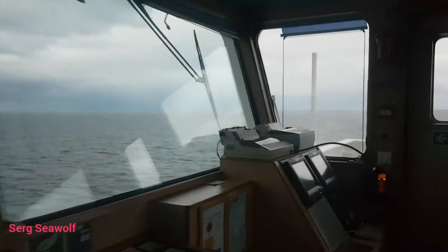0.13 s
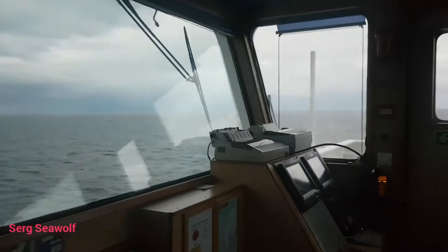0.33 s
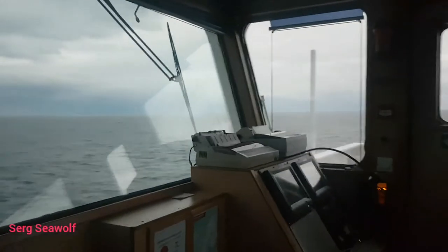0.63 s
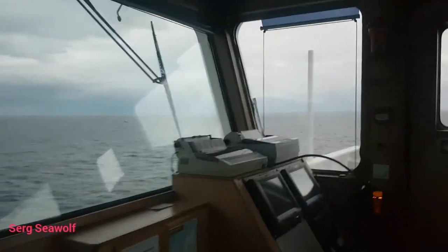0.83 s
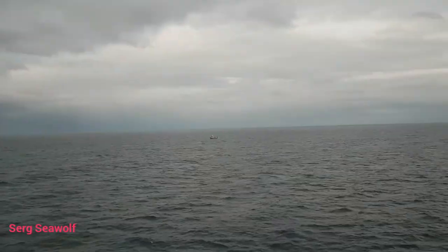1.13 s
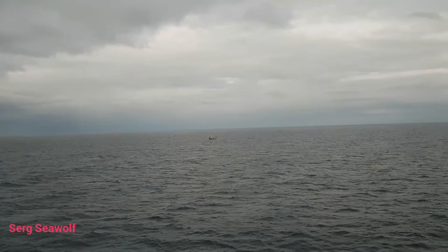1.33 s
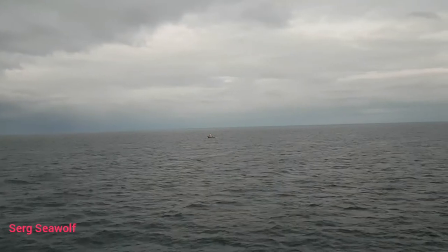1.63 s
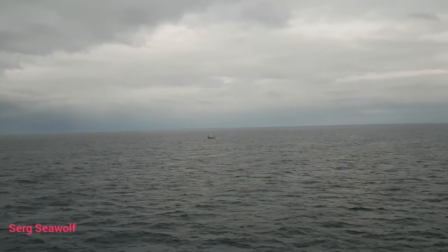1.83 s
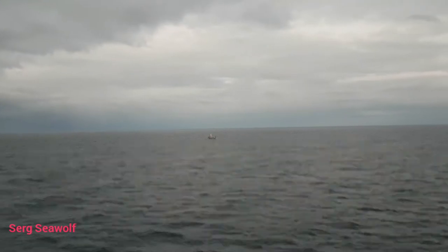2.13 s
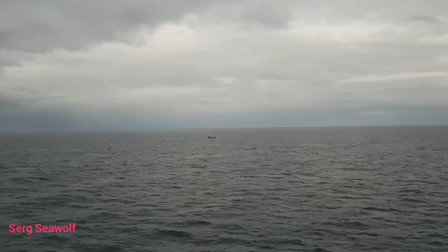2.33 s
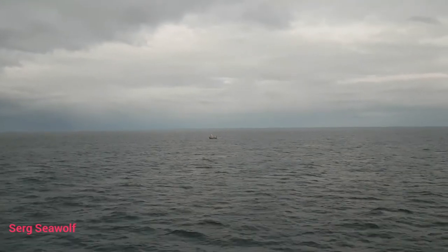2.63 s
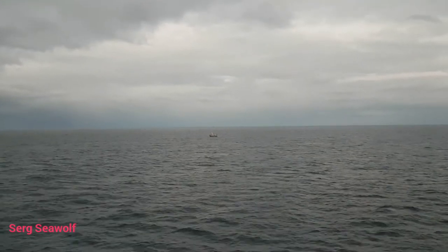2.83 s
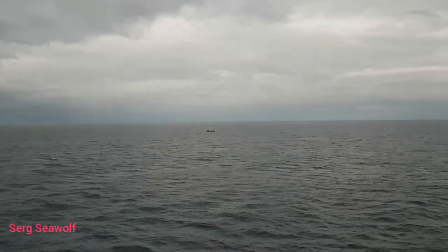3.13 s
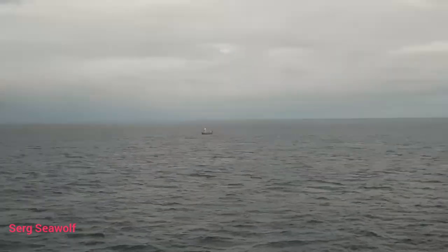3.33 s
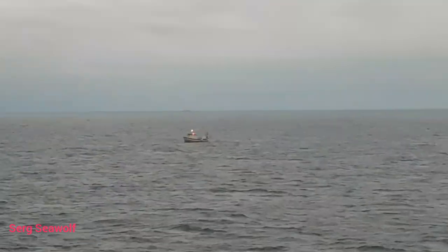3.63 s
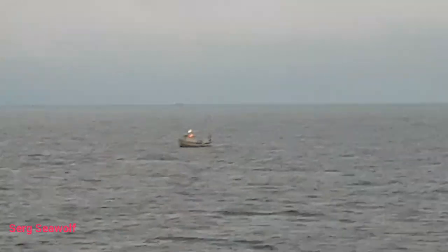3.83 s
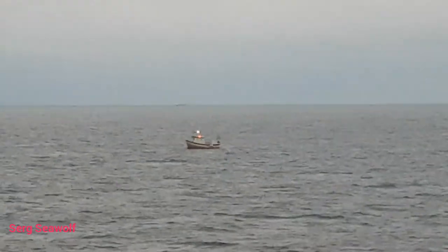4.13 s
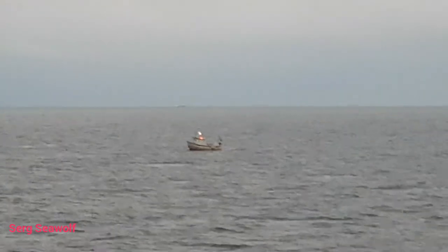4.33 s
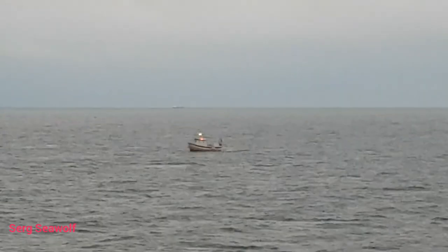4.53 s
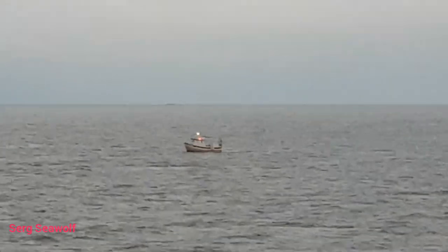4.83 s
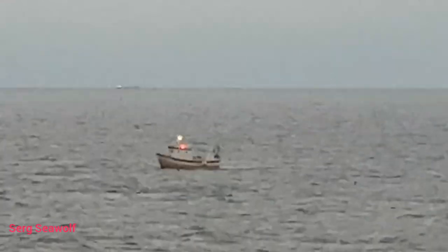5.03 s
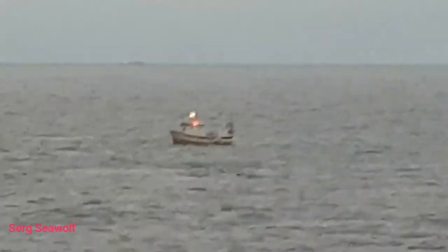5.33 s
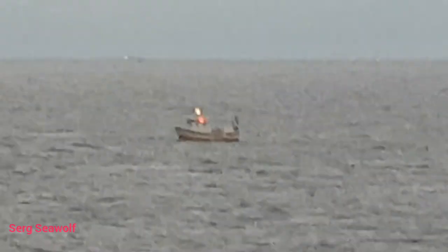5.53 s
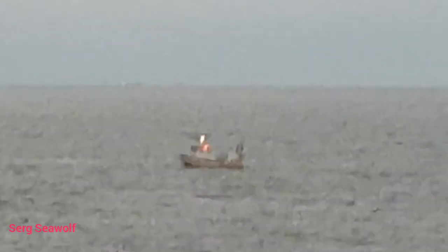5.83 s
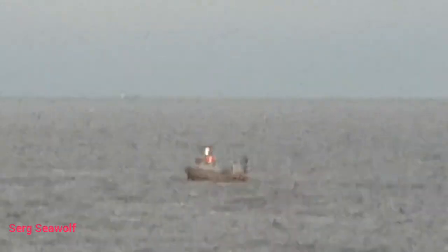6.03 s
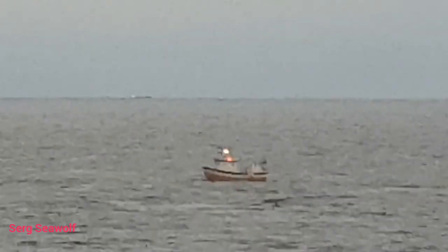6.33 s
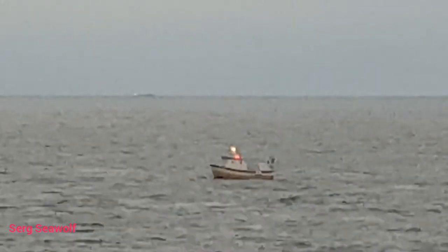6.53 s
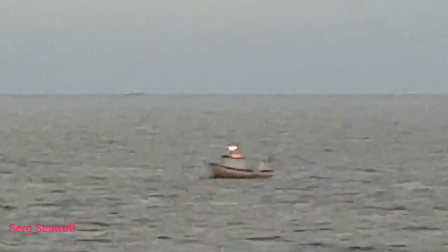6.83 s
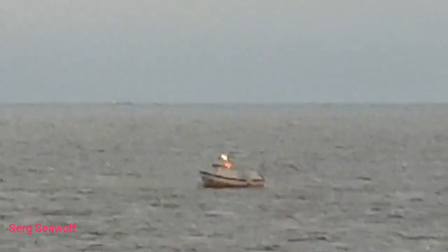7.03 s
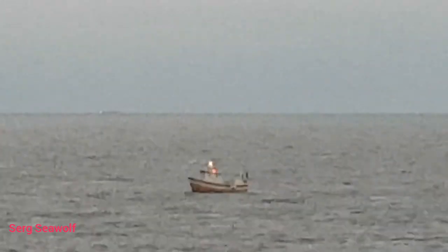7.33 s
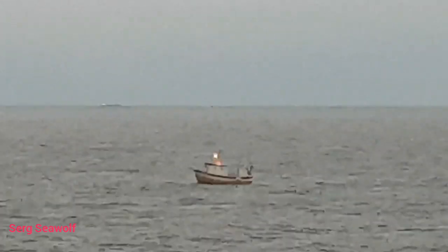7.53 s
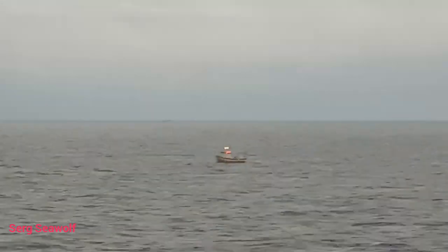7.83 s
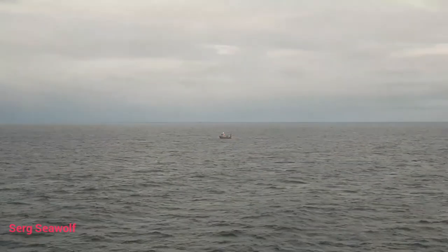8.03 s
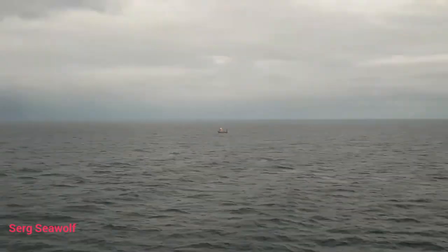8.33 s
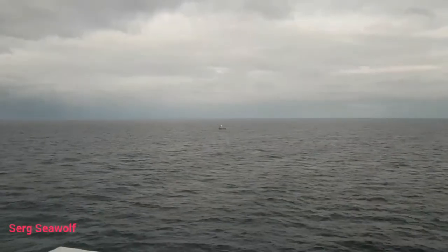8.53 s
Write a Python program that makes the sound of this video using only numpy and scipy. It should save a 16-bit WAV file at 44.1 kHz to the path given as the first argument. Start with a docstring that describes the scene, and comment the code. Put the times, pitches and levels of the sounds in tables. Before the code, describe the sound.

A short indoor machine hum gives way to irregular wind gusts thumping and popping on the microphone, with a ship's engine rumbling underneath.

```python
"""A small stereo microphone on a ship. First, sheltered in the wheelhouse, machinery hums over room noise. At
1.65 s a dry tick sounds and the scene changes to the open deck. Gusts sweep eddies over each port separately;
the faster the air, the higher the buffeting reaches. Sudden jets pop the diaphragm, amid dry crackles. Between
the gusts, engine rumble, sea wash and a thin hiss swell and sink together to the end."""
import sys
import numpy as np
from scipy import signal
from scipy.fft import rfft, irfft
from scipy.io import wavfile
from scipy.ndimage import uniform_filter1d

SR = 44100
rng = np.random.default_rng(int(sys.argv[2]) if len(sys.argv) > 2 else 0)


def to_wav(sig):
    """Store sig (one row per channel, or 1-D mono) as 16-bit WAV at the path in sys.argv[1].

    Samples outside -1..1 are clipped; the rate is SR.
    """
    pcm = np.clip(np.atleast_2d(sig), -1, 1) * 32767
    pcm = np.round(pcm).astype(np.int16)
    wavfile.write(sys.argv[1], SR, pcm.T)  # frames by channels


N = 383229
TIME_S = np.arange(N) / SR
ON_DECK_S = 1.6547
PORT_LAG_S = .0003   # travel time between the ports
LEFT, RIGHT = 1, -1


def from_db(db):
    return 10 ** (np.asarray(db) / 20)


def unit_rms(x):
    return x / np.sqrt(np.mean(x ** 2) + 1e-20)


def butter(x, order, hz, kind="low"):
    return signal.sosfilt(signal.butter(order, hz, kind, fs=SR, output="sos"), x)


def in_time(rows):
    """One per-sample curve for each column after the time."""
    times_s, *columns = np.transpose(rows)
    return [np.interp(TIME_S, times_s, column) for column in columns]


def at_hz(points, hz):
    """A spectrum read on a log-frequency axis."""
    points_hz, values = np.transpose(points)
    return np.interp(np.log(hz), np.log(points_hz), values)


def pan(left_right_db):
    """Left and right gains."""
    return from_db(left_right_db / 2 * np.array([[1], [-1]]))


def drift(rate_hz):
    """Slow random wander, rms 1."""
    hop, settle = 40, 2000
    pole = np.exp(-2 * np.pi * rate_hz * hop / SR)
    noise = rng.standard_normal(N // hop + settle + 2)
    slow = signal.lfilter([1], [1, -2 * pole, pole ** 2], noise)[settle:]
    return np.interp(np.arange(N) / hop, np.arange(len(slow)), unit_rms(slow))


def wavering_tone(hz, width_hz, waver_db):
    """A sine whose phase and level wander."""
    phase = 2 * np.pi * (hz * TIME_S + rng.random()) + 1.9 * drift(width_hz)
    return np.sqrt(2) * from_db(waver_db * drift(3.9)) * np.sin(phase)


def outdoors():
    """0 inside, 1 on deck; 4 ms crossfade."""
    return np.clip((TIME_S - ON_DECK_S) / .004, 0, 1)


# Left-right likeness of diffuse noise: (frequency [Hz], coherence [0..1])
COHERENCE = [(60, .93), (300, 0.94), (520, 0.91), (890, 1), (2000, 0.045), (4000, 0.017), (9000, 0.22),
             (15000, 0.87)]

def diffuse_noise(spectrum, balance, left_lag_s):
    """Coloured stereo noise, rms 1, alike at both ports in the bass and the top treble."""
    hz = np.maximum(np.fft.rfftfreq(N, 1 / SR), 1)
    mid, side = rfft(rng.standard_normal((2, N)))
    coherence = at_hz(COHERENCE, hz)
    mid = mid * np.exp(1j * np.pi * hz * left_lag_s * np.array([[-1], [1]]))
    pair = np.sqrt(1 + coherence) * mid + np.sqrt(1 - coherence) * side * [[1], [-1]]
    return unit_rms(irfft(pair * pan(at_hz(balance, hz)) * from_db(at_hz(spectrum, hz)), N))


# Hiss spectrum: (frequency [Hz], relative density [dB])
HISS_SPECTRUM = [(3000, -35.5), (7000, -17), (8500, -12.5), (10000, -12), (13000, -6), (15000, -4.5),
                 (16000, -14)]
# Hiss level, also followed by the deck noise: (time [s], level [dB])
BACKGROUND_SWELL = [(0, -76), (1.654, -76), (1.656, -86.5), (2.25, -81.5), (2.6, -85.5), (3.25, -85),
                    (3.5, -76.5), (4.03, -77), (4.2, -87.5), (4.8, -84.5), (5.45, -76.5), (5.86, -75.5),
                    (5.9, -78.5), (6.38, -83), (6.75, -75.5), (7.2, -75.5), (7.45, -82.5), (8.69, -79.5)]
# Balance of hiss and deck noise: (frequency [Hz], left over right [dB])
BACKGROUND_BALANCE = [(100, -4.5), (300, 0), (800, 8.5), (2600, 10.5), (4000, 6.5), (6000, 9), (12000, 1)]

def hiss():
    """Thin treble noise that swells and sinks."""
    swell_db, = in_time(BACKGROUND_SWELL)
    return from_db(swell_db) * diffuse_noise(HISS_SPECTRUM, BACKGROUND_BALANCE, left_lag_s=0)


def rustle(at_s=1.42, spread_s=.07, hz=3800, level_db=-73):
    """A faint, brief swell of narrow-band noise."""
    band = unit_rms(butter(rng.standard_normal(N), 2, [.92 * hz, 1.15 * hz], "band"))
    envelope = np.exp(-.5 * ((TIME_S - at_s) / spread_s) ** 2)
    return pan(4.4) * from_db(level_db) * envelope * band


# Machinery tones: (frequency [Hz], width [Hz], start level [dB], end level [dB], left over right [dB])
MACHINERY_TONES = [(48.4, 1.9, -42.5, -35.5, 1.5), (114.3, 11, -40.5, -38.5, -2.5),
                   (237.8, 1.4, -25, -36, 2.5), (597, 14, -55, -58, 9.5), (1196, 7.7, -68, -75.5, -10.5),
                   (3542, 3.0, -85, -84, 0)]
# Room noise spectrum: (frequency [Hz], relative density [dB])
ROOM_SPECTRUM = [(20, -37), (46, -25.5), (62, -13), (115, -4), (170, -8), (300, -20.5), (600, -28.5),
                 (750, -34.5), (1100, -34.5), (2000, -41.5), (3200, -54.5), (5000, -59.5), (8000, -77.5)]
# Room noise balance: (frequency [Hz], left over right [dB])
ROOM_BALANCE = [(200, -2), (800, 8), (1700, 10), (4000, 3.5), (6000, 5)]

def wheelhouse(room_db=-32):
    """Machinery hum, a rustle, and sheltered room noise that reaches the left port first."""
    progress = np.minimum(TIME_S / ON_DECK_S, 1) ** .6
    inside = np.zeros((2, N))
    for hz, width_hz, start_db, end_db, pan_db in MACHINERY_TONES:
        tone = wavering_tone(hz, width_hz, waver_db=4.2 if hz > 400 else 2.1)
        inside += pan(pan_db) * from_db(start_db + (end_db - start_db) * progress) * tone
    inside += rustle()
    inside += from_db(room_db) * diffuse_noise(ROOM_SPECTRUM, ROOM_BALANCE, -PORT_LAG_S)
    return (1 - outdoors()) * inside


# Engine tones on deck: (frequency [Hz], width [Hz], level over hiss [dB])
ENGINE_TONES = [(64.2, 2.2, 46.5), (114.3, 13, 46)]
# Rumble and wash spectrum: (frequency [Hz], relative density [dB])
DECK_SPECTRUM = [(20, -25), (65, -13), (120, -10.5), (206, -12), (300, -22), (550, -28.5), (970, -33.5),
                 (2170, -41), (3050, -53.5), (5000, -61), (8000, -83.5)]

def deck(wash_over_hiss_db=47):
    """Engine rumble and sea wash in the open; the noise reaches the right port first."""
    swell_db, = in_time(BACKGROUND_SWELL)
    engine = sum(from_db(db) * wavering_tone(hz, width_hz, waver_db=.5)
                 for hz, width_hz, db in ENGINE_TONES)
    wash_gain = from_db(wash_over_hiss_db + .32 * drift(2.3))
    wash = wash_gain * diffuse_noise(DECK_SPECTRUM, BACKGROUND_BALANCE, PORT_LAG_S)
    return outdoors() * from_db(swell_db) * (engine + wash)


def tick(peak_db=-33, decay_s=.0004):
    """A step that dies at once, where inside turns to outside."""
    age_s = TIME_S - ON_DECK_S
    return from_db(peak_db) * (age_s >= 0) * np.exp(-np.abs(age_s) / decay_s)


# Dry crackles: (time [s], gain [dB], left over right [dB], upper edge [Hz])
DRY_CRACKLES = [(.575, -64, 2, 5000), (2.177, -49.5, -11, 5000), (2.458, -60, 16, 8500),
                (2.4659, -55, 15, 11000), (2.481, -58, 18, 8500), (3.923, -56, -16, 9000),
                (4.0253, -58, -14, 7570), (4.038, -55.5, -13, 8500), (4.097, -61, -14, 6450),
                (5.8752, -46, -11, 8500), (6.001, -60, 13, 7983), (8.187, -50, 5, 5800)]

def crackles():
    """Short bright ticks, each with a faint gritty tail."""
    track = np.zeros((2, N + SR))
    age_s = np.arange(round(.05 * SR)) / SR
    envelope = np.exp(-age_s / .0025) + .3 * np.exp(-age_s / .014)
    for at_s, gain_db, pan_db, top_hz in DRY_CRACKLES:
        grit = butter(rng.standard_normal(len(age_s)) * envelope, 3, [1500, top_hz], "band")
        start = round(at_s * SR)
        track[:, start:start + len(grit)] += pan(pan_db) * from_db(gain_db) * grit
    return track[:, :N]


# Jets inside the gusts: (time [s], relative level [dB], pop pitch [Hz], port [+1 left, -1 right])
AIR_JETS = [(2.345, -22, 399.8, 1), (2.381, -6.5, 851, 1), (2.395, -16, 580, 1), (2.425, -14, 612, -1),
            (2.458, -12, 652, 1), (2.483, -16, 493, 1), (2.494, -11, 850, 1), (2.509, -11, 650, 1),
            (2.53, -13, 783, 1), (2.564, -18.5, 402.5, 1), (2.589, -9, 778, 1), (2.615, -13, 699.4, 1),
            (3.455, -18.5, 499, -1), (3.766, -21.5, 393.2, 1), (3.916, -19.5, 394, -1),
            (3.983, -19.5, 399, 1), (4.038, -8, 850.5, -1), (4.078, -22, 450.6, -1),
            (4.149, -10, 542.4, -1), (4.202, -8, 700.2, -1), (4.5, -13, 280, -1), (4.714, -13.5, 279.1, -1),
            (5.213, -26, 402.1, 1), (5.875, -8.5, 599.7, -1), (5.898, -20, 350.4, -1),
            (5.931, -20, 449.6, -1), (6.0, -7, 478.1, 1), (6.018, -20.5, 501, 1), (6.184, -20.5, 401.4, 1),
            (6.472, -21.5, 450.4, -1), (7.211, -21, 451.2, -1), (7.226, -17, 452.1, -1),
            (7.376, -12.5, 584.8, 1), (7.428, -10, 551, -1), (7.483, -19.5, 401, -1),
            (7.526, -21, 449.8, -1), (7.542, -15, 599.8, -1), (7.566, -14, 550, -1),
            (7.646, -18.5, 347.5, 1), (7.738, -18, 652, -1), (7.782, -13, 450.4, 1), (7.809, -12, 555.3, 1),
            (8.058, -14, 599.5, 1), (8.064, -12, 799.3, 1), (8.142, -16, 599.4, 1),
            (8.226, -12.5, 650.3, -1), (8.25, -12, 704, -1), (8.576, -16.5, 502.8, 1),
            (8.597, -17.5, 449.6, 1)]

def jets(port, pop_db=11, rise_s=.00043, decay_cycles=.47, kick_per_khz=7.0, kick_s=.004):
    """Each jet pops the diaphragm and briefly kicks up the air speed, more so for sharp jets."""
    pops, kicks = np.zeros((2, N + SR))
    age_s = np.arange(round(.04 * SR)) / SR
    polarities = rng.choice([-1, 1], len(AIR_JETS))
    for (at_s, level_db, hz, struck_port), polarity in zip(AIR_JETS, polarities):
        if struck_port == port:
            span = slice(round(at_s * SR), round(at_s * SR) + len(age_s))
            envelope = np.minimum(age_s / rise_s, 1) * np.exp(-age_s * hz / decay_cycles)
            pops[span] += polarity * from_db(level_db + pop_db) * envelope * np.sin(2 * np.pi * hz * age_s)
            kicks[span] += kick_per_khz * hz / 1000 * from_db(level_db) * np.exp(-age_s / kick_s)
    return pops[:N], kicks[:N]


# Relative pressure swing of the breeze: (time [s], left [dB], right [dB])
BREEZE_SWING = [(1.6, -47, -51), (1.68, -35, -30), (1.86, -20, -33), (2.26, -28.5, -25), (2.39, -14, -22),
                (2.94, -30, -37.5), (3.4, -21.5, -25.5), (3.59, -26, -18.5), (3.82, -14, -20),
                (4.15, -24, -15), (4.37, -18, -26), (4.83, -31.5, -29), (5.13, -30, -28),
                (5.27, -22, -33.5), (5.65, -22, -26), (5.91, -22.5, -17.5), (6.2, -16.5, -24),
                (6.37, -44.5, -41), (6.5, -29.5, -23), (7.01, -24.5, -26.5), (7.31, -13, -10.5),
                (7.48, -33.5, -14), (7.78, -22, -30), (8.65, -15.5, -21)]
# Gusts: (start [s], length [s], relative pressure swing [dB], air speed [m/s], port [+1 left, -1 right])
PORT_GUSTS = [(1.661, 0.024, -29, 6.62, -1), (1.724, 0.049, -26, 5.02, -1), (1.841, 0.023, -26.5, 6.5, 1),
              (1.936, 0.027, -21, 7.23, -1), (1.95, 0.045, -24, 6.87, 1), (1.994, 0.014, -17, 12.2, -1),
              (2.078, 0.028, -22, 7.04, 1), (2.148, 0.034, -17, 7.5, -1), (2.19, 0.043, -23.5, 5.13, 1),
              (2.265, 0.064, -15, 4.07, -1), (2.331, 0.1, -12.5, 11.06, 1), (2.367, 0.032, -22.5, 7.6, -1),
              (2.415, 0.034, -15, 11.84, -1), (2.453, 0.087, -13, 11.85, 1),
              (2.479, 0.047, -22.5, 10.95, -1), (2.56, 0.072, -11.5, 10.5, 1), (2.561, 0.12, -18, 7.85, -1),
              (2.657, 0.073, -19, 8.18, 1), (2.807, 0.024, -26, 4.86, 1), (2.945, 0.026, -28, 8.1, 1),
              (3.023, 0.066, -23.5, 7.44, 1), (3.139, 0.035, -24.5, 5.67, 1), (3.186, 0.061, -20, 6.39, -1),
              (3.276, 0.021, -23.5, 5.34, 1), (3.278, 0.047, -18.5, 7.32, -1), (3.326, 0.045, -18, 3.61, 1),
              (3.351, 0.063, -13, 8.64, -1), (3.428, 0.023, -18, 6.12, 1), (3.45, 0.017, -18.5, 10.46, -1),
              (3.528, 0.023, -22, 5.46, -1), (3.586, 0.043, -12, 6.25, -1), (3.687, 0.032, -14, 6.1, 1),
              (3.738, 0.041, -16.5, 9.3, 1), (3.783, 0.074, -23, 3.46, -1), (3.837, 0.033, -13.5, 8.2, 1),
              (3.908, 0.068, -11.5, 7.83, -1), (3.945, 0.016, -16.5, 10.26, 1),
              (3.975, 0.029, -16, 12.1, 1), (4.033, 0.075, -13.5, 9.32, -1), (4.097, 0.021, -27, 9.57, 1),
              (4.119, 0.11, -10.5, 11.44, -1), (4.15, 0.035, -12.5, 16.5, -1),
              (4.257, 0.022, -20, 10.43, 1), (4.335, 0.048, -20, 7.06, -1), (4.367, 0.067, -22, 8.56, 1),
              (4.457, 0.08, -22, 4.63, 1), (4.499, 0.035, -20, 7.5, -1), (4.55, 0.036, -24.5, 10.54, -1),
              (4.727, 0.04, -24, 9.46, -1), (5.166, 0.022, -25.5, 9.24, 1), (5.216, 0.017, -17.5, 6.91, 1),
              (5.248, 0.068, -17.5, 6.12, 1), (5.27, 0.05, -19, 4.81, -1), (5.573, 0.022, -16, 6.48, -1),
              (5.575, 0.022, -12.5, 6.95, 1), (5.615, 0.042, -8.5, 4.83, -1), (5.839, 0.089, -18, 5.93, 1),
              (5.87, 0.091, -13, 6.8, -1), (5.989, 0.083, -23, 5.4, -1), (5.996, 0.012, -15, 7.17, 1),
              (6.028, 0.016, -24, 9.15, 1), (6.177, 0.037, -15.5, 6.2, 1), (6.241, 0.038, -24.5, 4.5, 1),
              (6.464, 0.033, -17.5, 7.34, -1), (7.172, 0.027, -13, 5.18, -1), (7.212, 0.045, -16, 6.03, 1),
              (7.221, 0.085, -9, 9.1, -1), (7.281, 0.046, -18, 4.69, 1), (7.318, 0.033, -13.5, 6.34, -1),
              (7.367, 0.048, -15, 10.66, 1), (7.371, 0.083, -7.5, 14.46, -1), (7.473, 0.028, -15, 8.66, -1),
              (7.521, 0.06, -15.5, 8.45, -1), (7.594, 0.017, -14.5, 4.41, 1), (7.636, 0.03, -15.5, 6.97, 1),
              (7.641, 0.024, -12, 7.86, -1), (7.695, 0.029, -19, 6.44, 1), (7.715, 0.046, -17, 8.6, -1),
              (7.778, 0.014, -19, 8.9, 1), (7.806, 0.014, -17, 11.4, 1), (7.835, 0.022, -19, 4.43, -1),
              (7.903, 0.081, -19, 5.27, -1), (7.913, 0.039, -18.5, 7.15, 1), (7.994, 0.029, -19, 12.5, 1),
              (8.057, 0.031, -17, 9.78, 1), (8.123, 0.031, -10, 6.49, 1), (8.232, 0.04, -9.5, 11.85, -1),
              (8.28, 0.018, -17.5, 9.5, 1), (8.302, 0.036, -14.5, 7.5, -1), (8.338, 0.037, -23.5, 6.8, 1),
              (8.4, 0.041, -17.5, 6.2, 1), (8.492, 0.031, -12, 7.05, -1), (8.506, 0.041, -13, 5.95, 1),
              (8.569, 0.054, -16, 10.6, 1), (8.633, 0.05, -15, 7.55, -1), (8.649, 0.029, -17.5, 4.05, 1)]

def airflow(port, breeze_m_per_s=2.3, rise_s=.012, decay_s=.018):
    """Pressure swing and air speed at a port: each gust displaces the breeze, holds, then gives way."""
    swing_db = in_time(BREEZE_SWING)[0 if port == LEFT else 1]
    log_speed = np.full(N, np.log(breeze_m_per_s))
    for start_s, length_s, gust_db, gust_m_per_s, struck_port in PORT_GUSTS:
        if struck_port == port:
            span = slice(round((start_s - rise_s) * SR), round((start_s + length_s + 10 * decay_s) * SR))
            age_s = TIME_S[span] - start_s
            attack = np.clip(age_s / rise_s + .5, 0, 1)
            share = attack * np.exp(-np.maximum(age_s - length_s, 0) / decay_s)
            swing_db[span] += share * (gust_db - swing_db[span])
            log_speed[span] += share * (np.log(gust_m_per_s) - log_speed[span])
    return from_db(swing_db), np.exp(log_speed)


def eddy_row(steps_per_eddy):
    """Pressure along a frozen row of eddies, rms 1: mostly smooth, with a few sharp fronts."""
    fronts_db = 3.34 * np.sqrt(200) * uniform_filter1d(rng.standard_normal(3 * N), 200, mode="wrap")
    stirring = from_db(fronts_db) * rng.standard_normal(3 * N)
    eddy_pole, fine_pole = np.exp(-2 * np.pi / steps_per_eddy), .915
    row = signal.lfilter([1], [1, -2 * eddy_pole, eddy_pole ** 2], stirring)
    smoothing = [.97, 0, .0012, 1, -2 * fine_pole, fine_pole ** 2]   # removes the finest swirls
    return unit_rms(signal.sosfilt([smoothing] * 2, row))


def buffeting(port, eddy_m=.025, steps_per_eddy=400):
    """Eddies are dragged past the port: air speed sets how fast their pressure pattern is read."""
    swing, steady_m_per_s = airflow(port)
    row = eddy_row(steps_per_eddy)
    flutter = .08 * drift(20) + .16 * drift(65)
    pops, kicks = jets(port)
    speed_m_per_s = steady_m_per_s * np.exp(flutter) * (1 + kicks)
    position = np.cumsum(steps_per_eddy * speed_m_per_s / eddy_m / SR) % (len(row) - 1)
    pressure = np.interp(position, np.arange(len(row)), row)
    return swing * from_db(10 * flutter + 1.6 * drift(52)) * pressure + pops


def wind(drive_db=1.3, shared_bass=.25, saturation=.93):
    """Buffeting loses deep bass and gains thump in the ports; the diaphragm saturates; treble is cut."""
    pressure = from_db(drive_db) * np.array([buffeting(LEFT), buffeting(RIGHT)])
    pressure += shared_bass * butter(pressure, 2, 111)[::-1]   # large eddies press on both ports
    pressure = butter(pressure, 3, 52, "high")
    pressure += .52 * butter(pressure, 1, [130, 340], "band")   # thump
    diaphragm = pressure / (1 + np.abs(pressure / saturation) ** 4) ** (1 / 4)
    return butter(butter(diaphragm, 1, 2800), 4, 3500)


def scene():
    """Inside first, then outside in the wind."""
    return wind() + crackles() + tick() + wheelhouse() + deck() + hiss()


def record(dry):
    """Clip just under full scale, then a steep low-pass."""
    cutoff_hz = 15750
    limited = np.clip(dry, -.97, .97)
    return signal.sosfilt(signal.ellip(12, .5, 70, cutoff_hz, fs=SR, output="sos"), limited)


dry = scene()
out = record(dry)
to_wav(out)
```